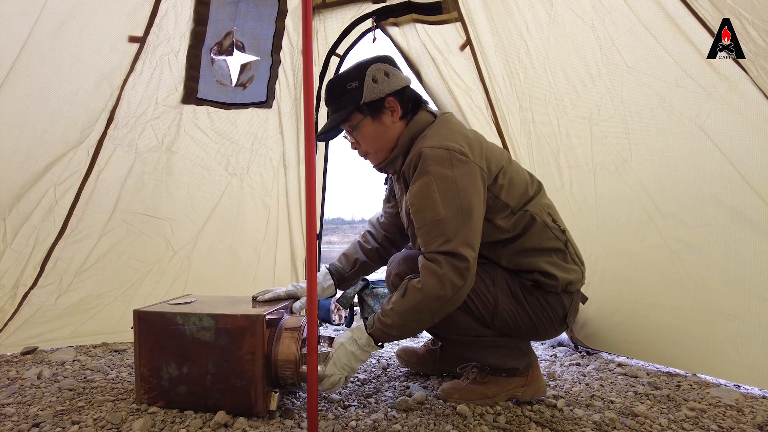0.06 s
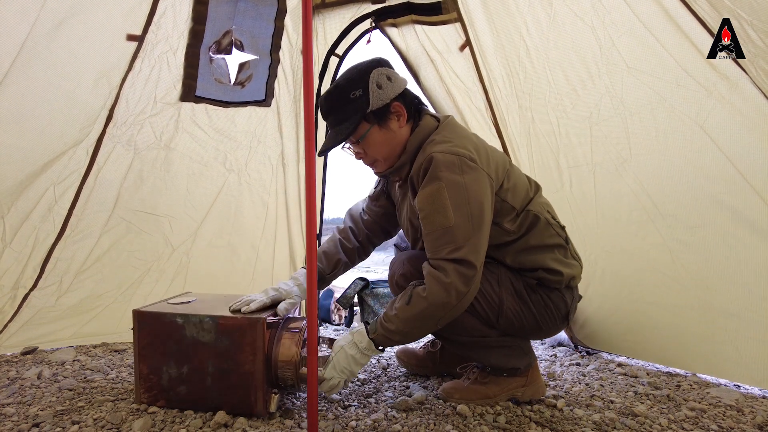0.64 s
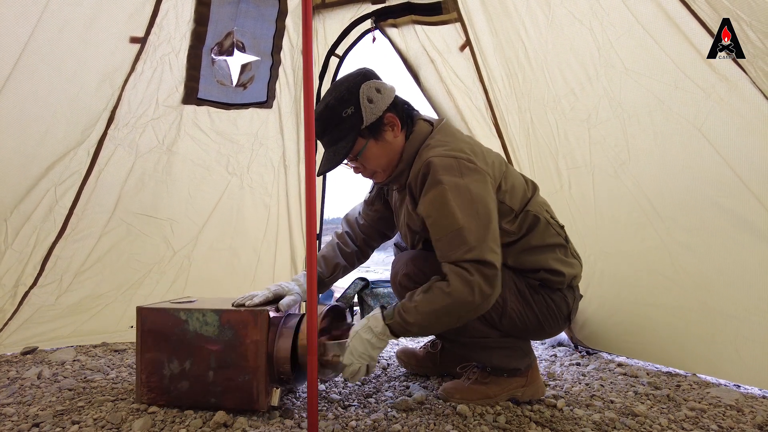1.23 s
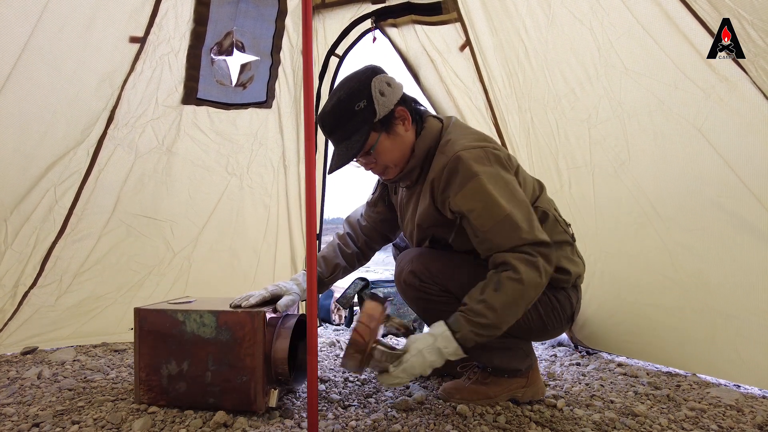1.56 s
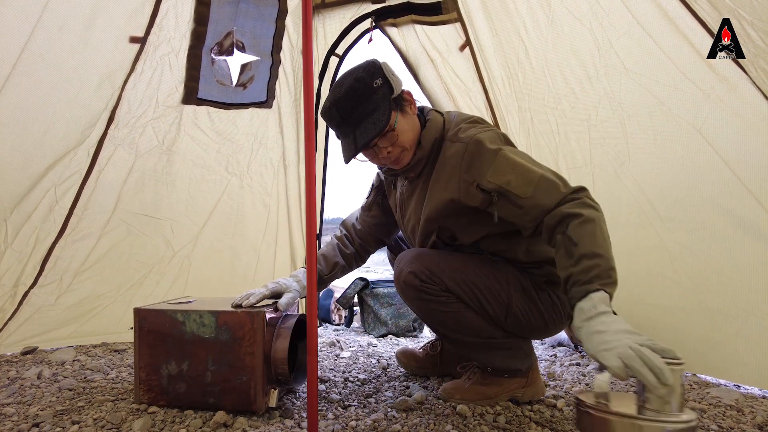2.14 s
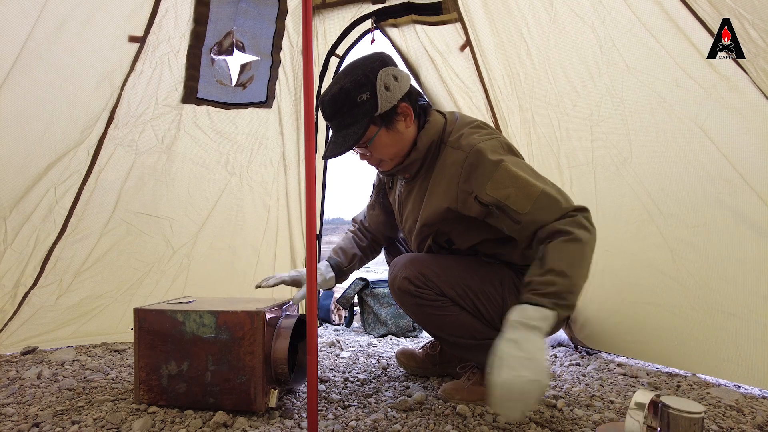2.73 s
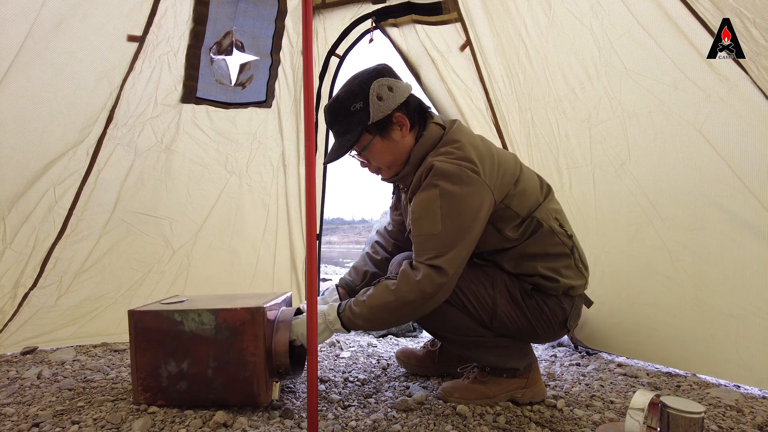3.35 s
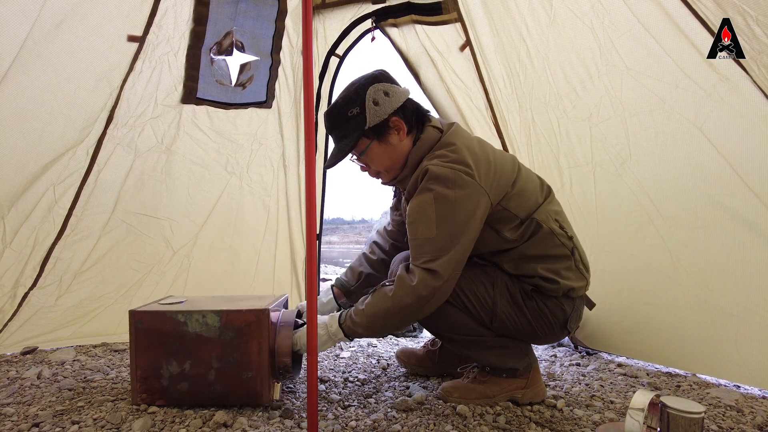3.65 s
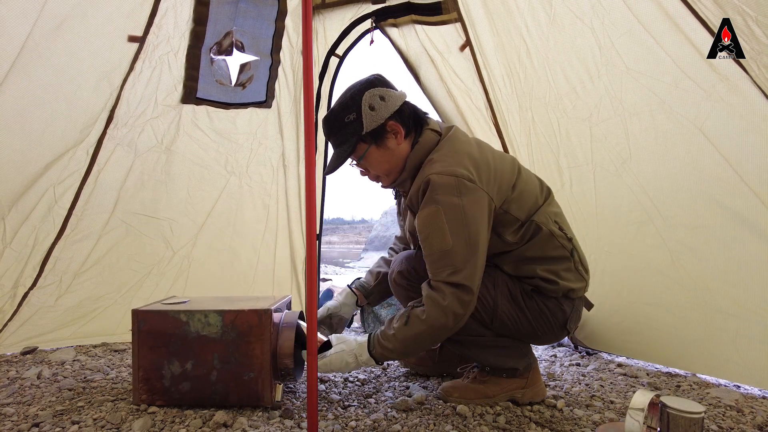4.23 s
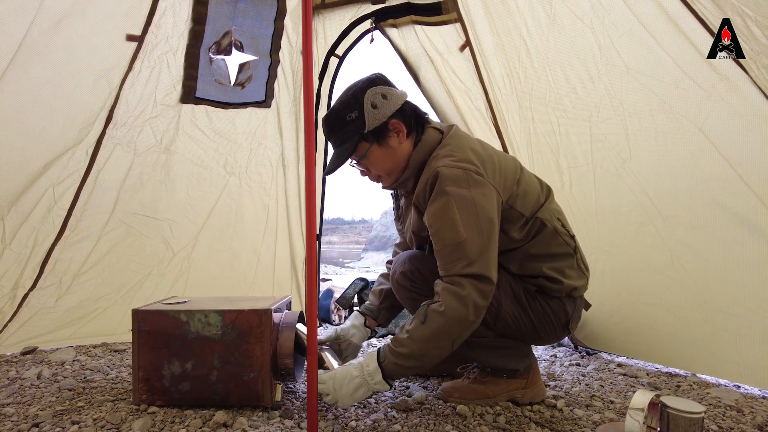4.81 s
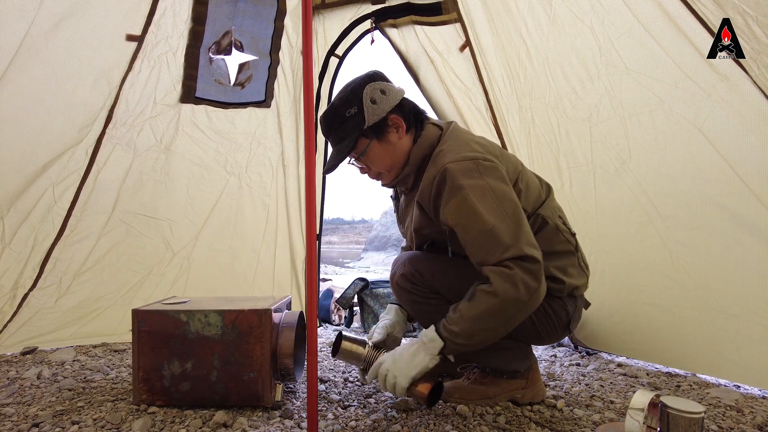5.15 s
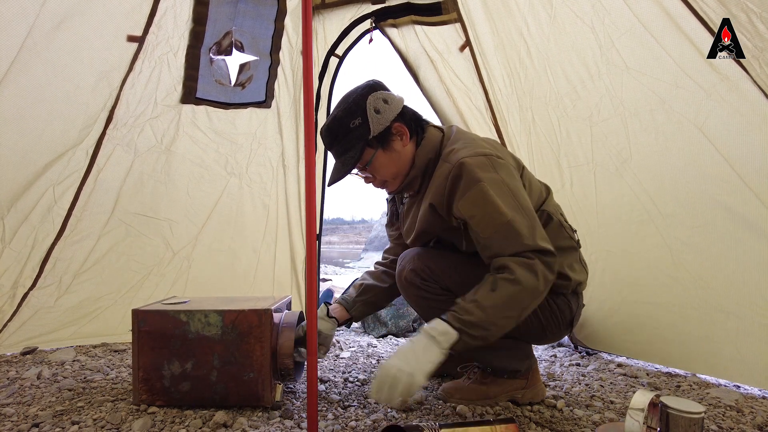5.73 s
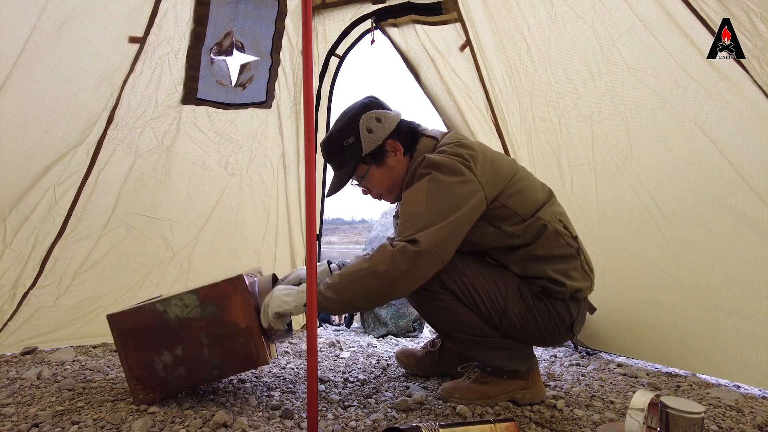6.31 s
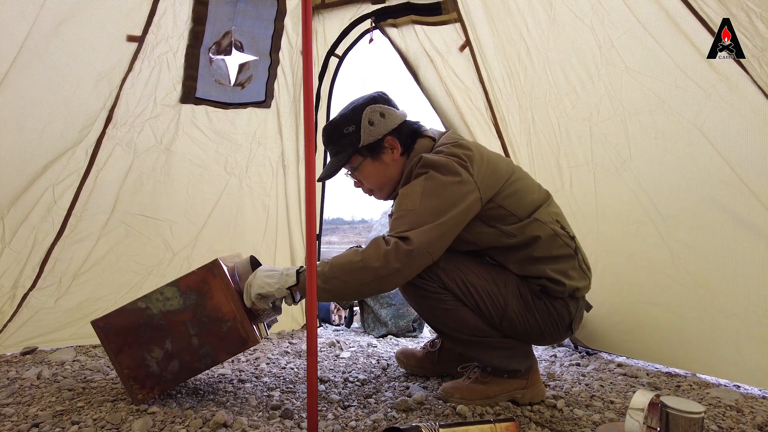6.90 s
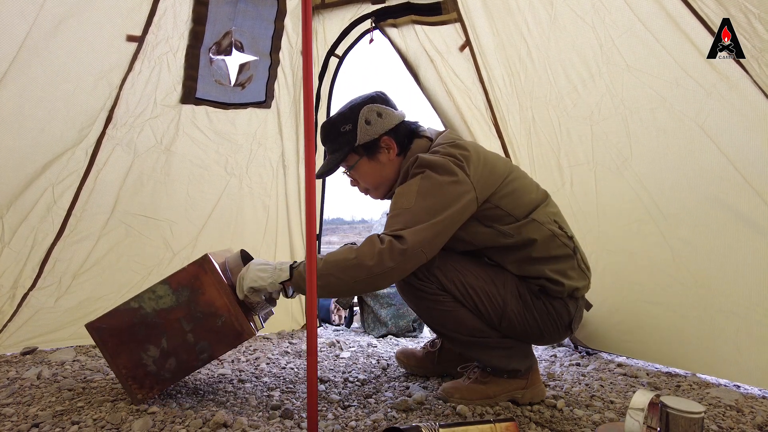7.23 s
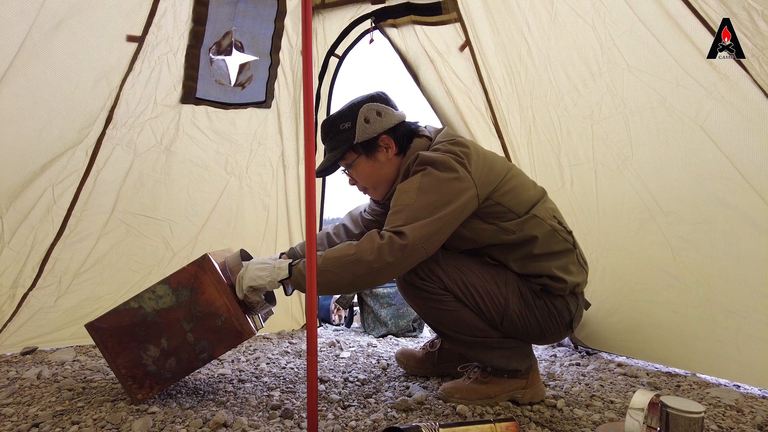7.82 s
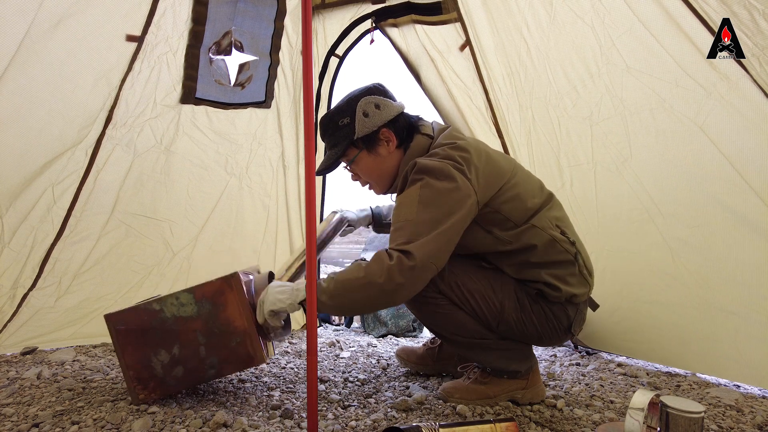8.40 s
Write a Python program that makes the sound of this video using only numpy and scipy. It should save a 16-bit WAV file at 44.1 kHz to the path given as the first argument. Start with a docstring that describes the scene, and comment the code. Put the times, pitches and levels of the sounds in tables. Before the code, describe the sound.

A small steel box stove scrapes and knocks hollowly as parts are pulled out, with a ringing door and clinks on gravel.

```python
"""In a tent, on gravel: someone kneeling unpacks a small steel box stove. The round door is worked loose,
comes off ringing and is damped as it lands on the stones. A pipe section is dragged out of the hollow
firebox in stick-slip jerks and put down; the box is tipped and more parts slide and bump inside, driving
its wall and air modes. A jacket rustles and wind rumbles faintly outside."""
import sys
import numpy as np
from scipy import signal
from scipy.fft import rfft, irfft, next_fast_len
from scipy.io import wavfile
from scipy.ndimage import uniform_filter1d

SR = 44100
rng = np.random.default_rng(int(sys.argv[2]) if len(sys.argv) > 2 else 0)


def dump(signal):
    """Clip the signal to [-1, 1] and save it as 16-bit WAV at the path in sys.argv[1]."""
    limited = np.clip(np.atleast_2d(signal).T, -1, 1)
    pcm = np.round(limited * 32767).astype(np.int16)
    wavfile.write(sys.argv[1], SR, pcm)


N = 381906
T = np.arange(N) / SR
RING_N = SR // 2
RING_T = T[:RING_N]
BASS_HZ, HOLLOW_HZ, CLANK_HZ, GRIT_HZ, TOP_HZ = 55, 300, 800, 2300, 19000  # firebox band edges


def amp(db):
    """Decibels to gain."""
    return 10 ** (np.asarray(db) / 20)


def unit(x):
    """Scale to rms 1."""
    return x / np.sqrt(np.mean(x ** 2))


def at_hz(table, hz):
    """Interpolate (f/Hz, value) rows over log frequency."""
    f, value = np.transpose(table)
    return np.interp(np.log(np.maximum(hz, 1)), np.log(f), value)


def band(x, lo_hz, hi_hz, order=3):
    """Causal band-pass."""
    return signal.sosfilt(signal.butter(order, [lo_hz, hi_hz], "band", fs=SR, output="sos"), x)


def walk(rate_hz, size=N):
    """Smooth random wander, spread near 1."""
    hold = int(SR / rate_hz)
    steps = np.repeat(rng.standard_normal(size // hold + 1), hold)
    return uniform_filter1d(steps[:size], hold)


def gesture(start_s, length_s, attack_s, release_s):
    """Envelope of one movement: ramp, hold, decay."""
    age = T - start_s
    return np.clip(age / attack_s, 0, 1) * np.exp(-np.clip((age - length_s) / release_s, 0, 20))


def fade(t60_s):
    """Free decay, 0.5 s long."""
    return np.exp(-np.log(1000) * RING_T / t60_s)


def struck(response, rise_s):
    """Soften the onset; scale the first 15 ms to rms 1."""
    response = response * (1 - np.exp(-RING_T / rise_s))
    return response / np.sqrt(np.mean(response[:, RING_T < 0.015] ** 2))


def add(out, start_s, sound):
    """Mix a sound in at start_s."""
    start = max(int(start_s * SR), 0)
    out[:, start:start + sound.shape[1]] += sound[:, :N - start]


def aim(x, lead):
    """Place a source off centre by left-channel phase lead: rows of f/Hz, lead/rad."""
    size = next_fast_len(N + 4096)
    turn = np.exp(.5j * at_hz(lead, np.fft.rfftfreq(size, 1 / SR)))
    return irfft(rfft(x, size) * np.array([turn, turn.conj()]), size)[:, :N]


# left-right coherence: f/Hz, coherence/0-1
COHERENCE = [(170, 0.99), (450, 0.85), (900, 0.75), (2500, 0.73), (5000, 0.25), (12000, 0.098)]
def stereo_noise(spectrum, size):
    """Noise shaped by (f/Hz, level/dB) rows; coherent bass, diffuse treble."""
    hz = np.fft.rfftfreq(size, 1 / SR)
    coherence = at_hz(COHERENCE, hz)
    phasors = np.exp(2j * np.pi * rng.random((2, len(hz))))
    mid, side = phasors * np.sqrt([1 + coherence, 1 - coherence])
    return unit(irfft(np.array([mid + side, mid - side]) * amp(at_hz(spectrum, hz)), size))


def ring(modes):
    """Damped sines from (f/Hz, level/dB, t60/s) rows; left-right phase gap grows with frequency."""
    out = 0
    for hz, db, t60 in modes:
        offset_rad = np.arccos(at_hz(COHERENCE, hz)) * rng.choice([-1, 1]) / 2
        phase = np.pi * rng.integers(2) + np.array([[offset_rad], [-offset_rad]])
        out = out + amp(db) * fade(t60) * np.sin(2 * np.pi * hz * RING_T + phase)
    return out


# wind rumble: f/Hz, level/dB
RUMBLE_SPECTRUM = [(15, -16), (25, 3.5), (60, -1.5), (100, -10.5), (170, -19.5), (400, -33), (1000, -48),
                   (4000, -84)]
# outdoor hiss: f/Hz, level/dB
HISS_SPECTRUM = [(200, 3), (500, 0), (800, -18.5), (1150, -20), (1650, -3.5), (2250, -17.5), (2850, -12.5),
                 (3600, -17), (6000, -21.5), (15500, -28.5)]
def wind(rumble_db=-54, hiss_db=-69.5, gust_db=1.5):
    """Low rumble swells gently under a faint, even hiss."""
    gusts = amp(gust_db * walk(5))
    rumble = stereo_noise(RUMBLE_SPECTRUM, N) * amp(rumble_db) * gusts
    return rumble + stereo_noise(HISS_SPECTRUM, N) * amp(hiss_db)


# arm and glove movements: t/s, length/s, level/dB
ARM_MOVES = [(-0.05, 1.53, -70.5), (1.387, 0.33, -71.5), (1.695, 0.94, -72), (2.056, 0.15, -67.5),
             (2.583, 3.5, -70.5), (2.96, 0.17, -68.5), (4.87, 0.26, -87), (5.42, 0.16, -82),
             (5.663, 0.41, -70.5), (7.07, 0.089, -76.5), (7.592, 0.39, -77)]
# cloth rustle: f/Hz, level/dB
CLOTH_SPECTRUM = [(240, -48.5), (400, -18.5), (481, -6), (738, -8.5), (1260, -2.5), (1910, -9),
                  (2590, -5.5), (3110, -9), (15500, -17)]
def jacket(gain_db=2, crinkle_db=2):
    """Stiff cloth hisses unevenly as the arms move."""
    motion = sum(amp(db) * gesture(t, length, attack_s=0.065, release_s=0.03)
                 for t, length, db in ARM_MOVES)
    return stereo_noise(CLOTH_SPECTRUM, N) * motion * amp(gain_db + crinkle_db * walk(100))


# stone clicks: t/s, level/dB, f/Hz, spectral skirt/dB
PEBBLE_CLICKS = [(1.644, -49, 1108, -40), (3.178, -57, 2070, -12), (4.886, -53, 2200, -33),
                 (5.264, -53, 3100, -32), (5.691, -52, 1250, -26), (5.888, -70, 1500, -24),
                 (6.028, -47.5, 1350, -26), (7.577, -53, 3200, -17.5)]
def pebbles(gain_db=-9, t60_s=0.054):
    """Small stones click dryly, each around its own pitch."""
    out = np.zeros((2, N))
    for t, db, hz, skirt_db in PEBBLE_CLICKS:
        click = stereo_noise([(hz / 4, skirt_db), (hz, 0), (hz * 3, skirt_db)], RING_N) * fade(t60_s)
        add(out, t, amp(db + gain_db) * struck(click, rise_s=0.0003))
    return out


# pipe on gravel: t/s, ring/dB, crunch/dB, position along pipe/0-1
PIPE_LANDINGS = [(5.5453, 1.5, 6.5, 0.4), (5.6, -4.5, -2, 1), (5.704, -27.5, -13.5, 1),
                 (5.801, -22.5, -14.5, 0)]
# pipe modes: f/Hz, level struck at 0/dB, level struck at 1/dB, t60/s
PIPE_END_MODES = [(547, -10, -10.5, 0.085), (1120, 16, -21.5, 0.15), (1614, -8, -6, 0.05),
                  (2040, -33, 8, 0.044), (2367, 10.5, -5.5, 0.071), (2610, -18, -1, 0.042),
                  (3215, -21, -12, 0.16), (3670, -24, 1, 0.058), (3914, -10, -1, 0.073),
                  (4130, -31, 6, 0.036), (4330, 0, -20, 0.19), (4630, -15, -9, 0.049),
                  (5281, -3, -20, 0.11), (5800, -16, -1, 0.047), (6300, -9, -16, .06), (8100, 4, -18, 0.09),
                  (11000, 2, -22, .06)]
# gravel crunch: f/Hz, level/dB
CRUNCH_SPECTRUM = [(240, -24.5), (400, -8.5), (543, -6.5), (749, -17.5), (1130, 1.5), (1380, -19),
                   (2030, -14), (2220, -14.5), (3620, -6.5), (6680, -12), (15500, -12)]
def pipe_down(ring_gain_db=-34, crunch_gain_db=-41, crunch_t60_s=0.11, rise_s=0.0035):
    """One end hits and rings, the other follows on loose gravel; the pipe rocks to rest."""
    out = np.zeros((2, N))
    for t, ring_db, crunch_db, position in PIPE_LANDINGS:
        modes = [(hz, np.interp(position, [0, 1], [near_db, far_db]), t60)
                 for hz, near_db, far_db, t60 in PIPE_END_MODES]
        crunch = stereo_noise(CRUNCH_SPECTRUM, RING_N) * fade(crunch_t60_s)
        add(out, t, amp(ring_db + ring_gain_db) * struck(ring(modes), rise_s))
        add(out, t, amp(crunch_db + crunch_gain_db) * struck(crunch, rise_s))
    return aim(out, [(500, -0.69), (1100, 0.85), (2400, -0.73)])


# door rim slipping in its collar: t/s, level/dB
RIM_SLIPS = [(1.26, -3), (1.275, 0.5), (1.304, 6), (1.312, -28.5)]
# rim scrape: f/Hz, level/dB
SCRAPE_SPECTRUM = [(120, -58.5), (200, -32), (263, 4), (310, -19), (378, 5.5), (957, -32), (2090, -10),
                   (2960, -35.5), (3240, -8), (3890, -20.5), (5010, -7), (7090, -16.5), (15500, -17)]
# firebox direction: f/Hz, left lead/rad
FIREBOX_LEAD = [(170, 0.031), (420, 0.033), (950, 1.42), (1800, 0.057), (6000, 0.98)]
def door_pull(gain_db=-28, low_t60_s=0.35, high_t60_s=0.14):
    """The rim leaves the collar in a few bright slips; the open box holds their lows longer."""
    out = np.zeros((2, N))
    for t, db in RIM_SLIPS:
        scrape = stereo_noise(SCRAPE_SPECTRUM, RING_N)
        lows = band(scrape, BASS_HZ, CLANK_HZ) * fade(low_t60_s)
        highs = band(scrape, CLANK_HZ, TOP_HZ) * fade(high_t60_s)
        add(out, t, amp(db + gain_db) * struck(lows + highs, rise_s=0.0053))
    return aim(out, FIREBOX_LEAD)


DOOR_FREE_S, DOOR_DOWN_S = 1.326, 2.546
# hand-held door modes: f/Hz, level/dB, t60/s, t of lobe facing listener/s
DOOR_FREE_MODES = [(712, -66, 8.1, 1.95), (1135, -60.5, 3.6, 1.82), (1381, -51.5, 3.9, 1.64),
                   (1670, -52, 3.4, 1.66), (1782, -53.5, 2, 1.45), (1992, -66, 2.8, 1.5),
                   (2099, -56, 1.6, 1.53), (2342, -68.5, 2.3, 1.4), (2470, -49, .45, 1.4),
                   (2717, -52, 3.9, 1.68), (2818, -49.5, 1.8, 1.5), (3122, -52.5, 2.53, 1.7),
                   (3219, -60.5, 1.3, 1.6), (3543, -47.5, 1.3, 1.6), (3660, -52, 0.96, 1.42),
                   (4460, -63, 1.2, 1.46), (4700, -61.5, 1.2, 1.5), (5841, -67, 1.2, 1.6),
                   (6250, -65, 1.2, 1.5), (6930, -73, 0.54, 1.48), (7220, -70.5, 1, 1.5)]
def door_ring(lobe_db=4.5, waver_depth=0.4, waver_hz=17, twin_db=-9, twin_detune=0.0032, stop_s=0.02):
    """Modes beat with sharper twins; lobes sweep by as the door turns; reflections make it waver."""
    age = np.maximum(T - DOOR_FREE_S, 0)
    held = (T < DOOR_DOWN_S + .1) & (age > 0)
    t, out = T[held], np.zeros((2, N))
    for hz, db, t60, facing_s in DOOR_FREE_MODES:
        sweep_hz = 2.9 * (hz / 1400) ** 0.65
        sweep_db = lobe_db * np.cos(2 * np.pi * sweep_hz * (t - facing_s))
        twin = amp(twin_db) * np.exp(2j * np.pi * (twin_detune * hz * t + rng.random()))
        reflections = waver_depth * (walk(waver_hz, len(t)) + 1j * walk(waver_hz, len(t)))
        stereo_rad = np.array([[1], [-1]]) * rng.standard_normal() * 0.57
        tone = np.imag((1 + twin + reflections) * np.exp(1j * (2 * np.pi * hz * t + stereo_rad)))
        decay = np.exp(-np.log(1000) * age[held] / t60)
        out[:, held] += tone * amp(db + sweep_db) * decay
    stone_damping = np.exp(-np.maximum(T - DOOR_DOWN_S, 0) / stop_s)
    return out * stone_damping


# door on stones: t/s, level/dB
DOOR_LANDINGS = [(2.544, 5.5), (2.552, 5), (2.558, 3.5), (2.576, -8)]
# stone-damped door modes: f/Hz, level/dB, t60/s
DOOR_DAMPED_MODES = [(531.5, -30.5, 0.14), (713, -39, 0.19), (1050, -43, 0.13), (1254, -37.5, 0.14),
                     (1360, -39, 0.17), (1650, -46, 0.26), (1873, -44.5, .2), (2042, -31.5, 0.095),
                     (2150, -43, 0.42), (2895, -26, 0.08), (3157, -31, 0.082), (3895, -42, .07),
                     (4550, -21, .055), (5195, -28.5, 0.05), (5615, -31.5, 0.14), (5790, -27.5, .06),
                     (6212, -27.5, 0.068), (7900, -25.5, 0.099), (9300, -25.5, 0.05), (10920, -33, 0.07),
                     (11880, -35.5, .07), (13660, -35, .06)]
# door crash: f/Hz, level/dB
CRASH_SPECTRUM = [(180, -31), (300, -29), (424, -26.5), (526, -12), (600, -21), (1030, -28.5),
                  (1240, -18.5), (2400, -21), (3000, -10.5), (3690, -19.5), (5850, -7.5), (6790, -17),
                  (7880, -10.5), (15500, -17.5)]
def door_down(crash_gain_db=-30, crash_t60_s=0.071, clink_rise_s=0.0026):
    """The rim clinks and crashes on several stones in quick succession; they damp its ring."""
    out = np.zeros((2, N))
    clink = ring(DOOR_DAMPED_MODES) * (1 - np.exp(-RING_T / clink_rise_s))
    add(out, DOOR_DOWN_S, clink)
    for t, db in DOOR_LANDINGS:
        crash = stereo_noise(CRASH_SPECTRUM, RING_N) * fade(crash_t60_s)
        add(out, t, amp(db + crash_gain_db) * struck(crash, rise_s=0.00085))
    return aim(out, [(100, 0.0), (500, -0.28), (2500, -0.7), (6000, 1.4)])


# thin-wall ring: f/Hz, level/dB
WALL_SPECTRUM = [(90, 4), (170, 4), (280, 2), (420, 6), (600, 4.5), (850, -7.5), (1030, -11.5),
                 (1220, -6.5), (1650, -2.5), (2000, -10), (2250, -13), (3000, -4.5), (3900, -10.5),
                 (5000, -9.5), (7200, -16), (15500, -19.5)]
# its decay: f/Hz, t60/s
WALL_DECAY = [(100, 1), (500, 0.51), (1700, 0.37), (4000, 0.29), (12000, 0.12)]
def dense_ring():
    """Crowded thin-wall modes as octave bands of noise, each with its own decay."""
    spectrum = rfft(stereo_noise(WALL_SPECTRUM, RING_N))
    hz = np.fft.rfftfreq(RING_N, 1 / SR)
    centres_hz = 125 * 2. ** np.arange(8)
    out = 0
    for centre_hz, weights in zip(centres_hz, np.eye(len(centres_hz))):
        octave = irfft(spectrum * at_hz(np.c_[centres_hz, weights], hz), RING_N)
        out = out + octave * fade(at_hz(WALL_DECAY, centre_hz))
    return out


# firebox wall and air modes: f/Hz, level/dB, t60/s
FIREBOX_MODES = [(60.9, -14, 1), (97.8, -3.5, 0.26), (146.4, -12, 0.91), (161.3, 5.5, 0.079),
                 (177.1, -2.5, 0.25), (192.7, -14, 1.08), (265.4, -6, 0.23), (343, -10.5, 0.16),
                 (380.8, -2, 0.12), (443.3, -8, 0.64), (473, -8.5, 0.49), (519.7, -12, 0.66),
                 (606, -22.5, 0.9), (651, -10, 0.13), (733, -19.5, 0.34), (998, -19, 0.36),
                 (1087, -29.5, 0.19), (1540, -32, 0.87), (1633, -30, 0.55), (1697, -27.5, 0.55),
                 (1980, -31, 0.73), (2700, -29.5, 0.68), (3000, -44.5, .25), (6030, -40, 0.16)]
def box_response(detune=0.007, spot_spread_db=3, dense_db=-2):
    """The firebox touched at a random spot; parts leaning on the walls detune its modes."""
    modes = np.array(FIREBOX_MODES, float)
    modes[:, 0] *= 1 + detune * rng.standard_normal(len(modes))
    modes[:, 1] += spot_spread_db * rng.standard_normal(len(modes))
    return ring(modes) + amp(dense_db) * dense_ring()


# pipe rims colliding: t/s, level/dB, f/Hz, t60/s
RIM_HITS = [(3.368, -40.5, 1670, 0.2), (3.387, -36.5, 1663, 0.3), (4.309, -27.5, 1753, 0.053),
            (4.507, -31, 1717, 0.08), (6.536, -46, 1737, 0.16), (7.664, -64.5, 4240, 0.13),
            (8.326, -33, 2004, 0.42)]
# rim partials: frequency ratio, level/dB
RIM_MODES = [(.93, -3), (1, 0), (1.4, -14.5), (1.51, -14), (1.655, -12.5), (2, -10.5), (2.2, -11),
             (2.56, -8.5), (2.73, -10)]
def clangs(damping_exponent=0.86, rise_s=0.0012):
    """Rim meets rim inside the box with a clang or a tink; high partials die first."""
    out = np.zeros((2, N))
    for t, db, hz, t60 in RIM_HITS:
        modes = [(hz * ratio, mode_db, t60 / ratio ** damping_exponent) for ratio, mode_db in RIM_MODES]
        add(out, t, amp(db) * struck(ring(modes), rise_s))
    return out


def stroke_response(db, bright_db, tick_db=3, tick_t60_s=0.038):
    """One friction jerk: a dry contact tick, then box ring. Thud grows less with level than clank."""
    box = box_response() * (1 + amp(tick_db) * fade(tick_t60_s))
    pivot_db, tilt_db = -37.5, 0.38 * bright_db
    thud_db = pivot_db + 0.64 * (db - pivot_db)
    response = 0
    for lo_hz, hi_hz, band_db in [(BASS_HZ, HOLLOW_HZ, thud_db - 2),
                                  (HOLLOW_HZ, CLANK_HZ, db - tilt_db - 2),
                                  (CLANK_HZ, GRIT_HZ, db + tilt_db - 5),
                                  (GRIT_HZ, TOP_HZ, db + bright_db - 15)]:
        part = band(box, lo_hz, hi_hz)
        response = response + amp(band_db) * part / np.linalg.norm(part[0])
    return response


# parts twisted or drawn lightly along the box: t/s, length/s, level/dB, brightness/dB
LIGHT_RUBS = [(-0.06, 0.38, -53, -5), (0.439, 0.047, -65, -30), (0.602, 0.38, -54, -10),
              (1.014, 0.46, -54, 1), (3.279, 0.74, -45, -1), (4.072, 0.325, -43.5, 0.5),
              (4.482, 0.33, -52.5, 5.5), (6.042, 0.562, -51, -2), (7.058, 0.23, -66, -14),
              (7.869, 0.14, -53.5, -1), (7.994, 0.64, -50.5, 2.5)]
# shoves that skid the steel: t/s, length/s, level/dB, brightness/dB
SKIDS = [(0.115, 0.094, -44, -2.5), (0.491, 0.04, -42.5, 0.5), (0.647, 0.16, -45.5, 0),
         (0.766, 0.13, -45, 5), (1.04, 0.058, -39.5, -10.5), (1.234, 0.14, -33, 3),
         (3.358, 0.13, -35, -1.5), (3.523, 0.097, -39.5, -2), (3.679, 0.049, -37, -3),
         (4.278, 0.056, -30.5, 6.5), (4.504, 0.065, -30, -3), (4.625, 0.083, -28, -4.5),
         (4.781, 0.067, -59, 18.5), (6.123, 0.14, -45, -0.5), (6.158, 0.026, -44, 14),
         (6.386, 0.036, -50, 0), (6.539, 0.028, -34.5, -1), (7.983, 0.045, -46.5, 4),
         (8.062, 0.059, -61, 19), (8.134, 0.089, -44.5, 5), (8.306, 0.17, -34.5, 2)]
def slides(jerks_per_s=480, scatter_db=4, catch_db=2.5, rasp_db=-20):
    """Rusty steel sticks and slips: tiny jerks drive the box; the finest roughness hisses in spurts."""
    jerks = (rng.random(N) < jerks_per_s / SR) * rng.choice([-1, 1], N)
    jerk_db = scatter_db * np.minimum(rng.exponential(size=N), 2) + catch_db * walk(60)
    jerks = unit(jerks * amp(jerk_db))
    out, roughness = np.zeros((2, N)), np.zeros(N)
    for strokes, attack_s in [(LIGHT_RUBS, 0.05), (SKIDS, 0.014)]:
        for t, length, db, bright_db in strokes:
            pressure = gesture(t, length, attack_s, release_s=0.014)
            moving = pressure > .001
            force = unit(jerks[moving]) * pressure[moving]
            add(out, t, signal.fftconvolve(force[None], stroke_response(db, bright_db)))
            roughness += pressure * amp(db + bright_db)
    rasp = stereo_noise([(1500, -5.5), (5000, 4.5), (9000, 1.0), (15500, -8.0)], N)
    return out + rasp * roughness * amp(rasp_db + catch_db * walk(60))


# blows on the firebox: t/s, thud/dB, thud f/Hz, clank/dB, brightness/dB, wall t60/s
BOX_BLOWS = [(0.16, -38, 125, -54.5, 4.5, 0.12), (0.215, -46, 115, -47.5, 3, 0.13),
             (0.432, -37.5, 158, -53.5, 3.5, .14), (0.664, -44, 160, -52.5, 3, .14),
             (0.777, -37.5, 164, -43.5, 2.5, 0.15), (0.808, -33, 118, -49.5, -3.5, 0.085),
             (0.833, -31.5, 148.7, -54, -5, 0.35), (0.885, -35, 146, -61.5, -10.5, 0.09),
             (1.032, -50, 188, -53.5, 1.5, 0.15), (1.084, -32, 135.4, -50.5, 6, 0.094),
             (1.155, -36.5, 170, -70, -1, 0.098), (1.205, -36.5, 147, -59, 5, 0.11),
             (1.254, -40, 132, -40.5, 5.5, 0.15), (1.304, -30, 148, -42.5, -8, 0.072),
             (3.292, -51, 180, -57.5, 1.5, .14), (3.317, -39, 186, -53, -3.5, 0.17),
             (3.386, -37, 263, -36, 7.5, 0.12), (3.437, -32.5, 141, -43, -0.5, 0.14),
             (3.511, -27, 160, -48, -2, 0.082), (3.532, -30.5, 164, -53, -7.5, 0.082),
             (3.677, -29.5, 148, -40.5, 0.5, 0.12), (3.744, -34, 270, -45, -1.5, .14),
             (3.845, -30.5, 167.5, -49, -4, 0.19), (3.942, -40.5, 137, -48, 7, .14),
             (4.077, -43.5, 109, -46, 2.5, .14), (4.11, -39, 99, -48, -5, 0.22),
             (4.163, -24.5, 172, -70, -3, 0.17), (4.235, -26.5, 154.4, -44, -2, 0.33),
             (4.28, -32, 147, -38.5, 3, .14), (4.311, -16.5, 177.3, -29.5, 3, 0.12),
             (4.365, -40, 150, -40.5, 1.5, .12), (4.47, -34, 150, -38.5, 0.5, .14),
             (4.508, -22, 173.5, -34.5, 0, 0.12), (4.596, -29, 159, -37.5, 3.5, 0.3),
             (4.683, -23, 176, -37.5, 4.5, 0.22), (4.782, -38, 160, -54.5, -8.5, .16),
             (6.174, -36.5, 136, -52, -1, 0.28), (6.436, -46, 146, -46, 0.5, .14),
             (6.534, -30, 176, -39.5, 2.5, 0.095), (7.073, -50, 181, -73.5, -11, .14),
             (7.25, -55, 190.2, -81, -17, .14), (8.028, -37, 286, -55, 1, 0.11),
             (8.178, -41, 141, -48.5, 0.5, 0.17), (8.322, -32, 149, -29, 6.5, .14),
             (8.351, -45, 164, -34.5, 4.5, .14), (8.383, -18.5, 168, -37.5, 4, 0.08),
             (8.424, -30, 95, -44.5, 0, 0.21), (8.52, -40.5, 190, -58, -5, 0.11)]
def knocks(bite_s=0.068, rise_s=0.0058):
    """The struck wall thuds and the whole box rings; brighter blows trade hollow tone for grit."""
    out = np.zeros((2, N))
    bite = 1 + np.exp(-RING_T / bite_s)
    for t, thud_db, hz, clank_db, bright_db, wall_t60 in BOX_BLOWS:
        box = bite * box_response()
        slope_db = 8 - bright_db
        parts = [(thud_db - 6, band(box, hz / 1.68, hz * np.sqrt(2), order=2)),
                 (thud_db - 2.5, ring([(hz, 0, wall_t60)])),
                 (clank_db + slope_db - 1, band(box, HOLLOW_HZ, CLANK_HZ)),
                 (clank_db, band(box, CLANK_HZ, GRIT_HZ)),
                 (clank_db - slope_db - 1, band(box, GRIT_HZ, TOP_HZ))]
        blow = sum(amp(db) * struck(part, rise_s) for db, part in parts)
        add(out, t - .002, blow)
    return out


def scene():
    """Firebox slightly left, loose parts laid down to the right."""
    firebox = aim(knocks() + clangs() + slides(), FIREBOX_LEAD)
    door = door_pull() + door_ring() + door_down()
    return firebox + door + pipe_down() + pebbles() + jacket() + wind()


def record(dry):
    """Steep low-pass at 15.85 kHz."""
    return signal.sosfilt(signal.ellip(10, .2, 70, 15850, fs=SR, output="sos"), dry)


dry = scene()
out = record(dry)
dump(out)
```